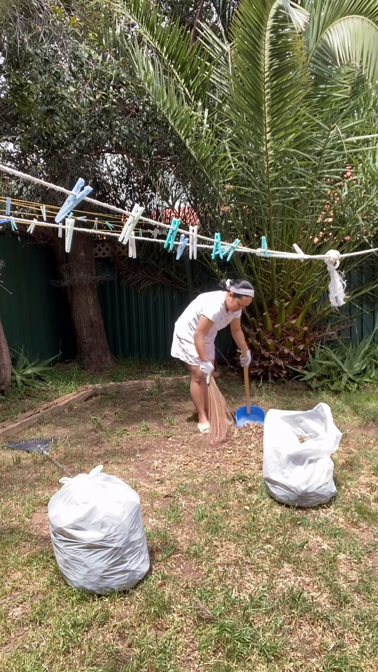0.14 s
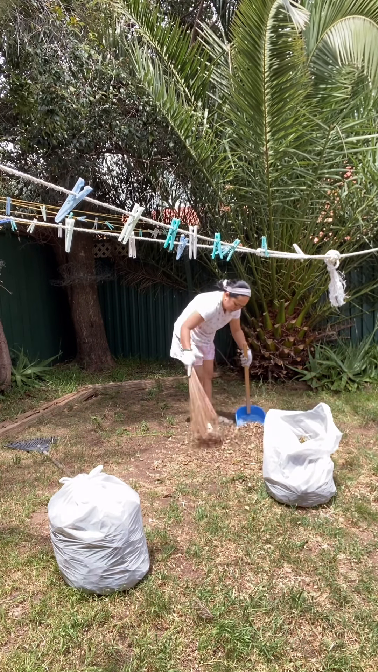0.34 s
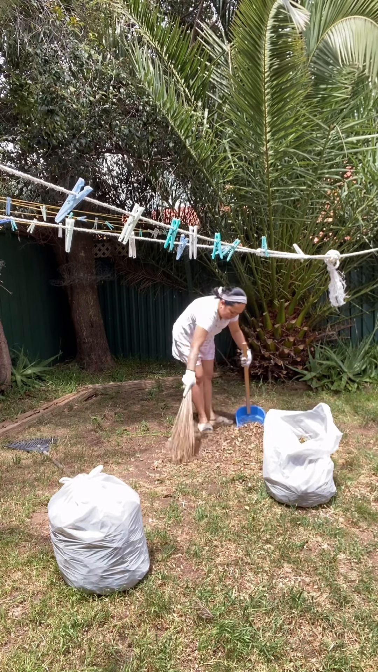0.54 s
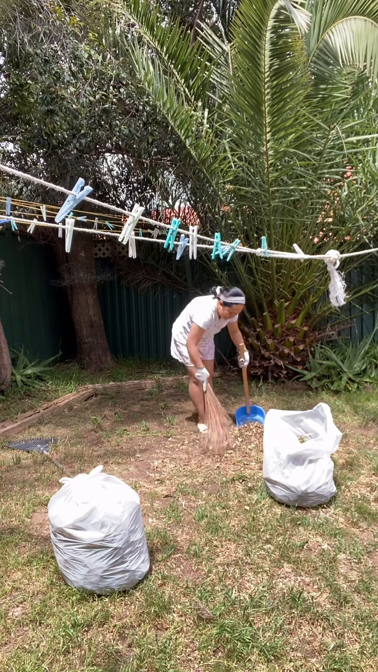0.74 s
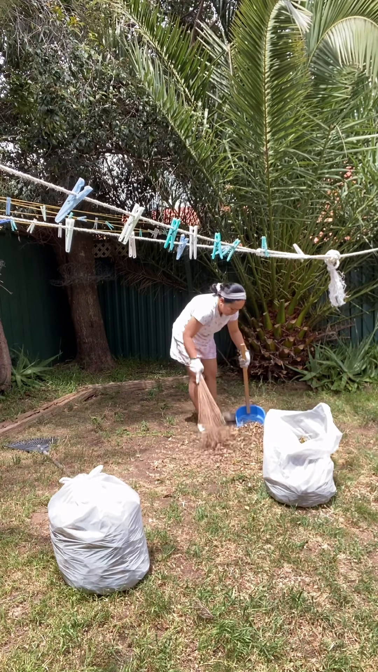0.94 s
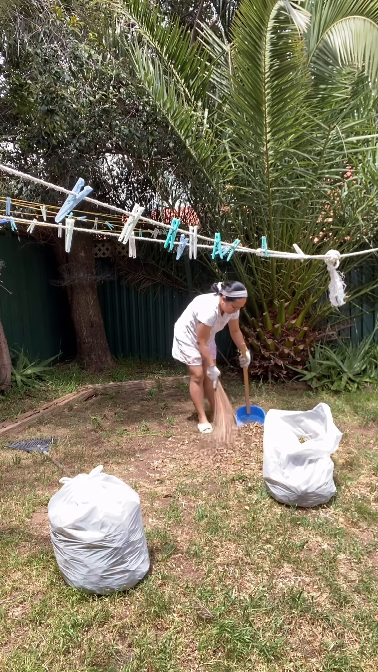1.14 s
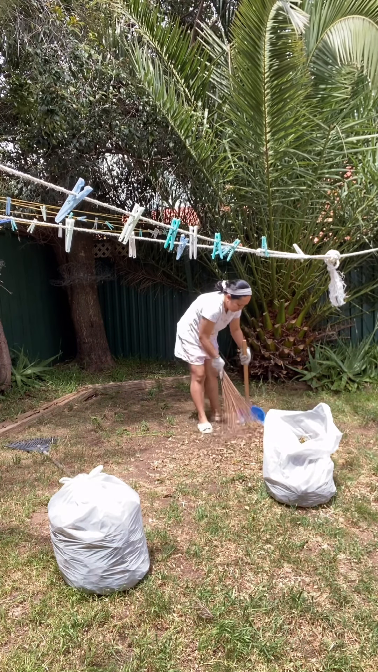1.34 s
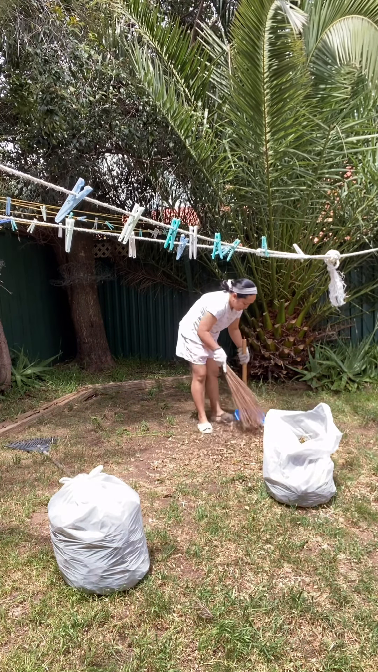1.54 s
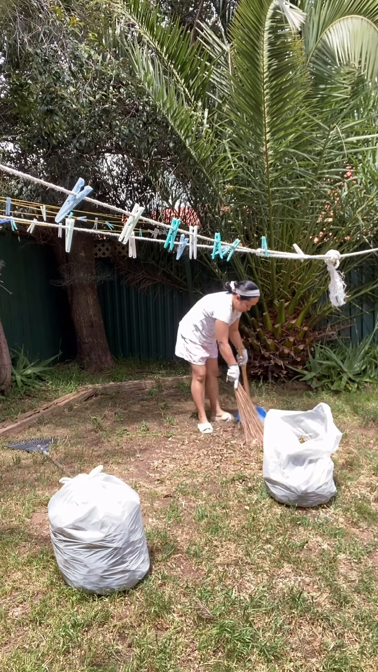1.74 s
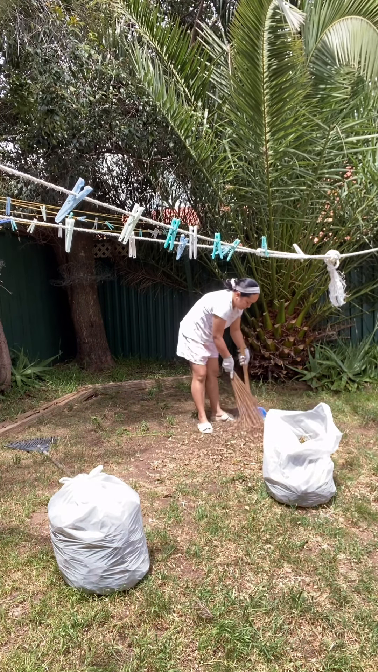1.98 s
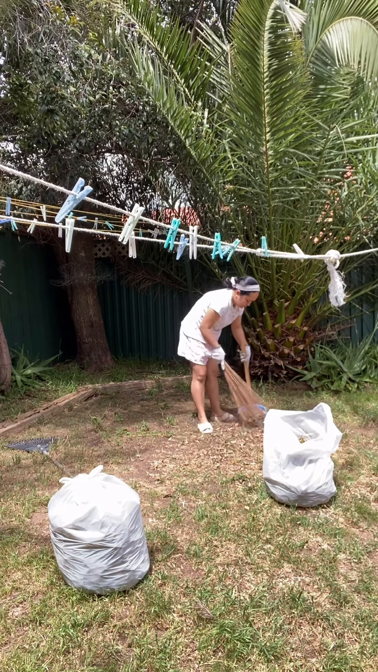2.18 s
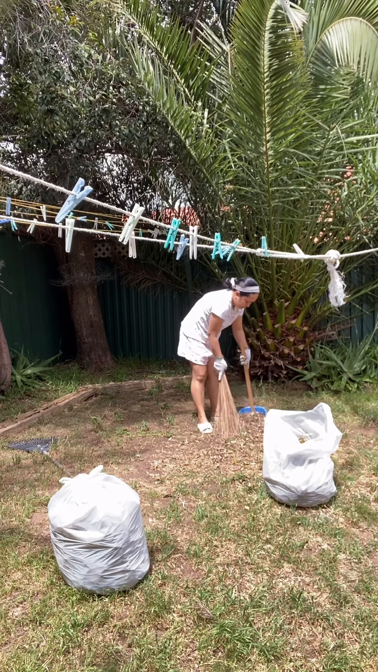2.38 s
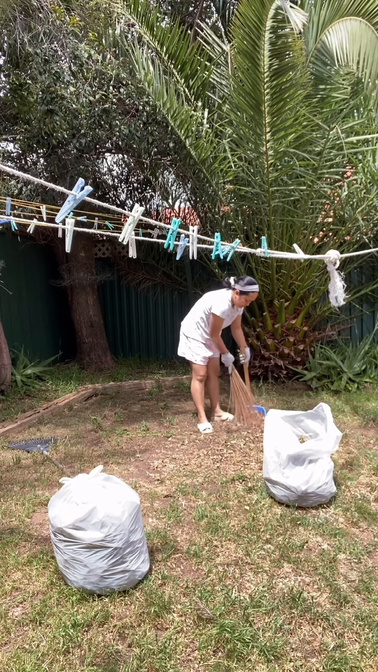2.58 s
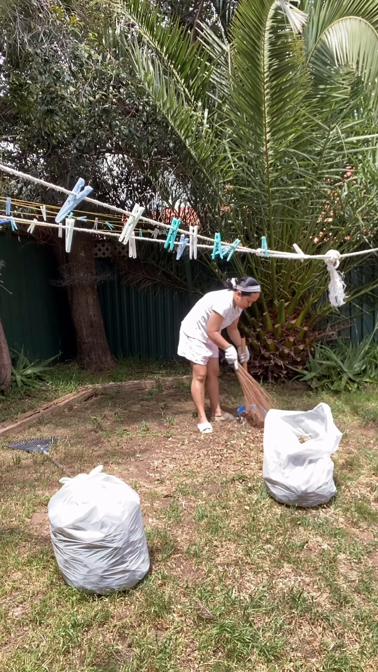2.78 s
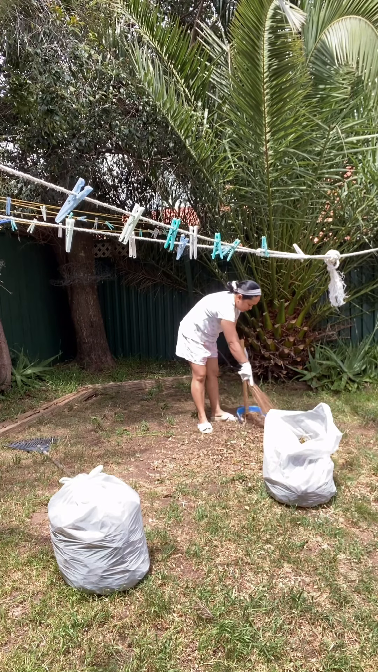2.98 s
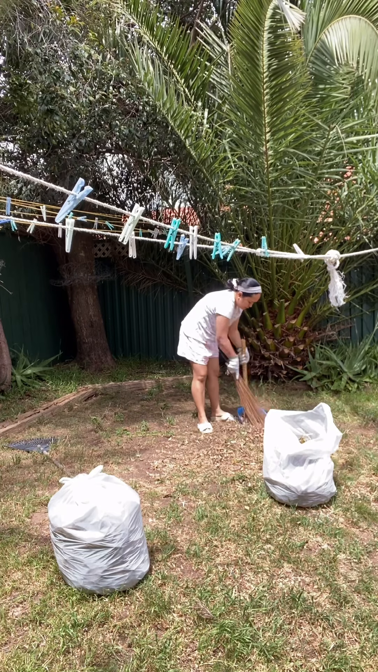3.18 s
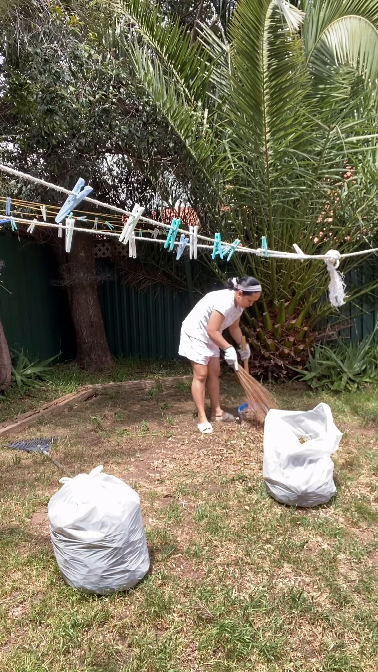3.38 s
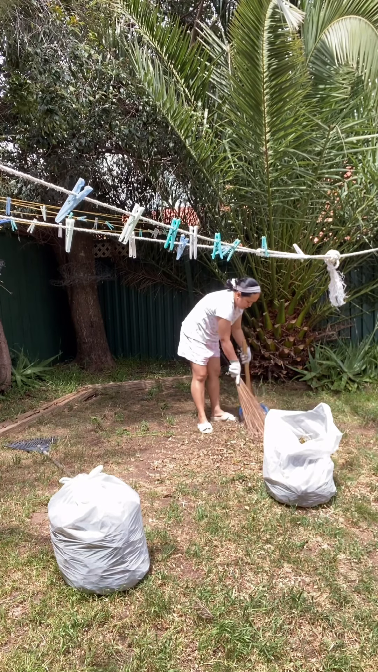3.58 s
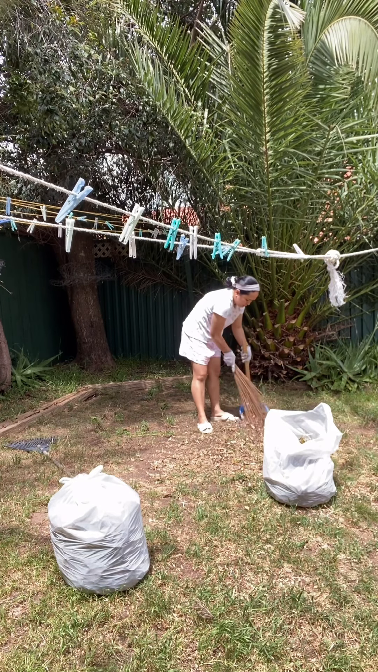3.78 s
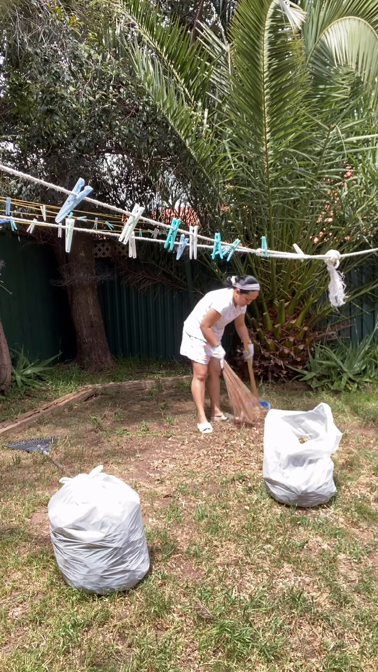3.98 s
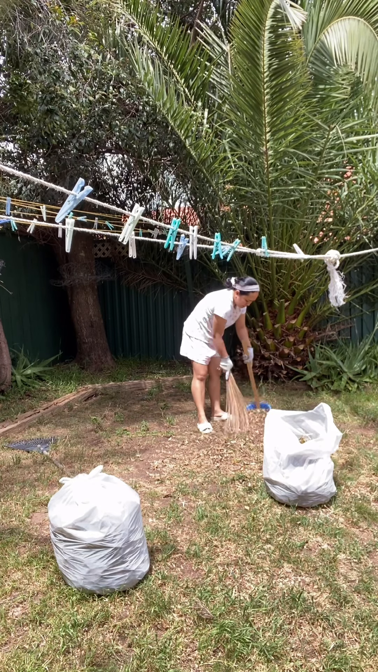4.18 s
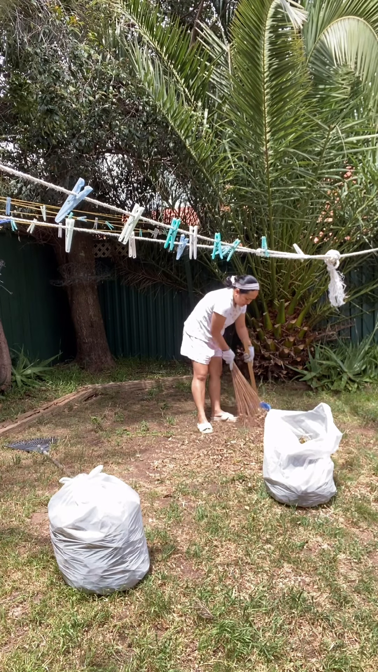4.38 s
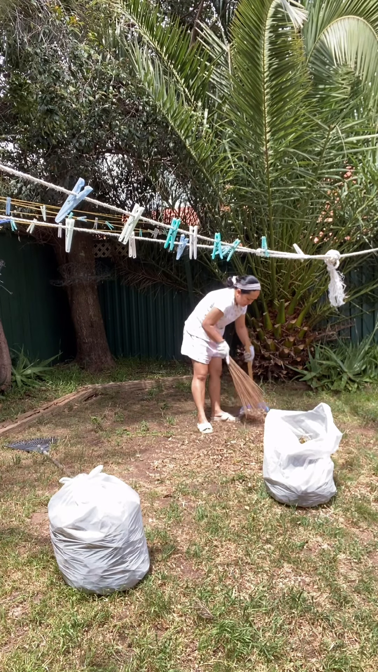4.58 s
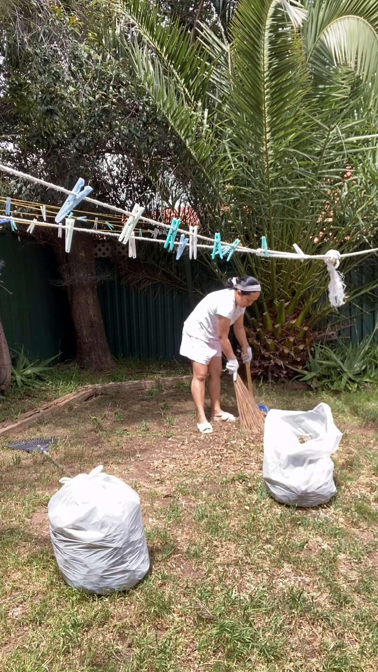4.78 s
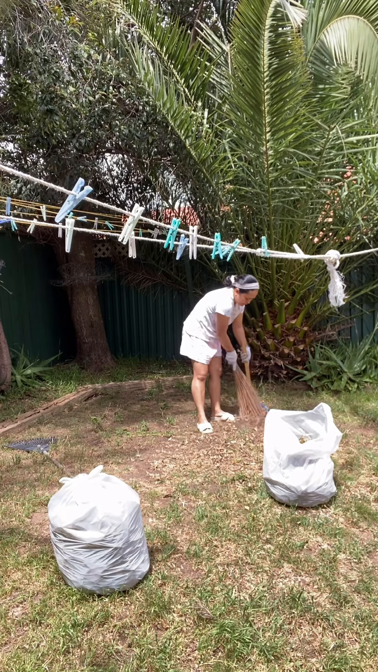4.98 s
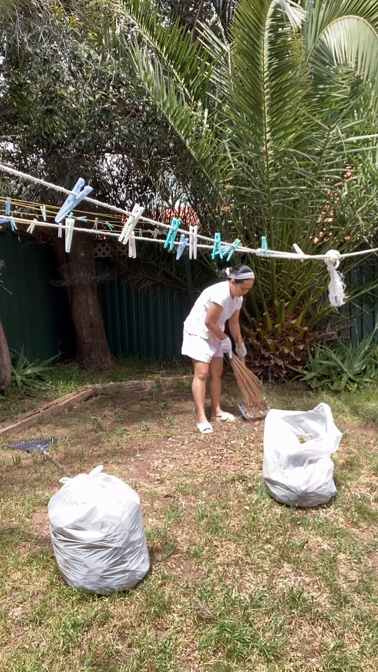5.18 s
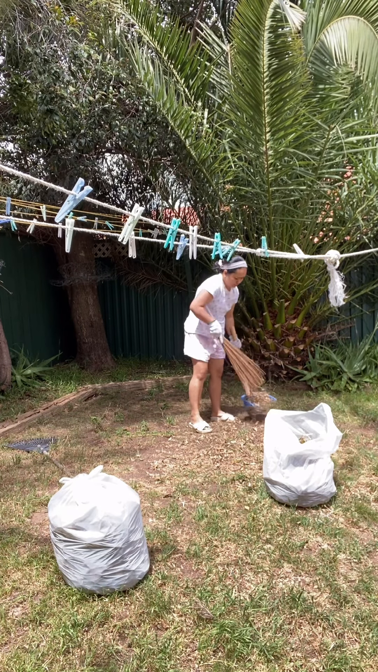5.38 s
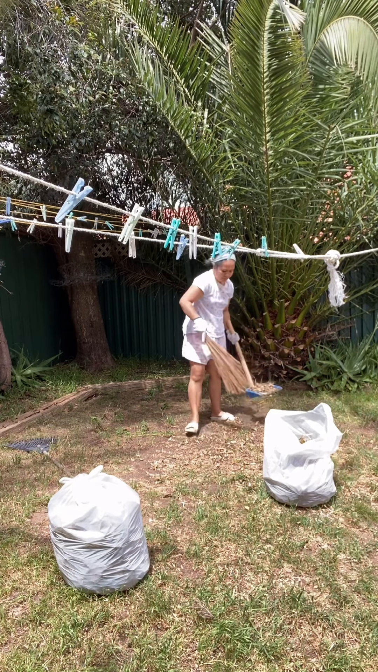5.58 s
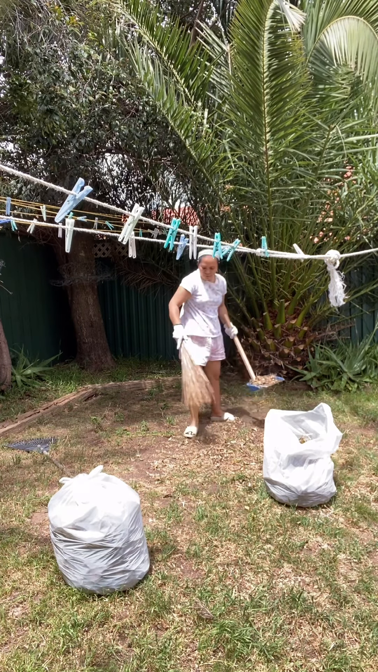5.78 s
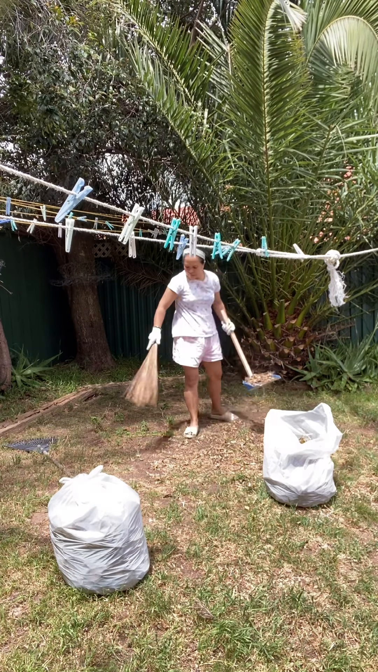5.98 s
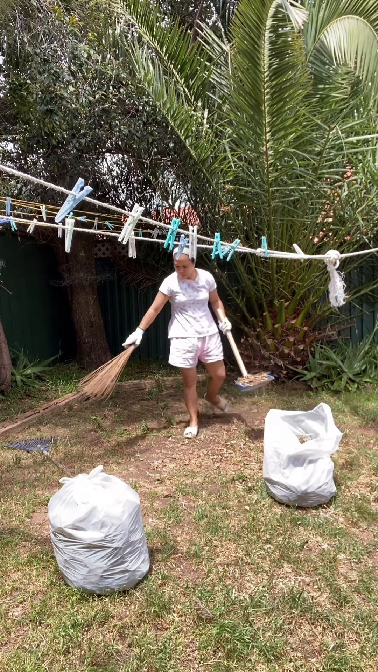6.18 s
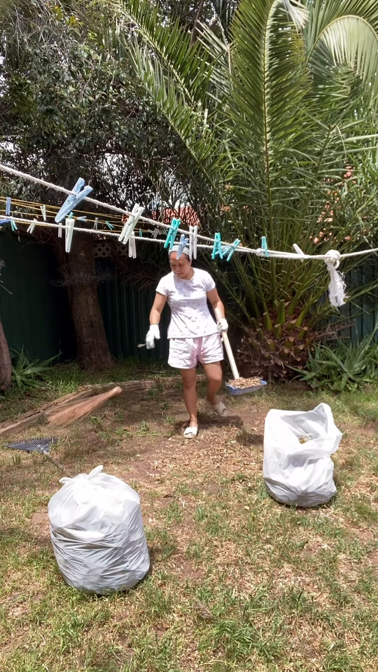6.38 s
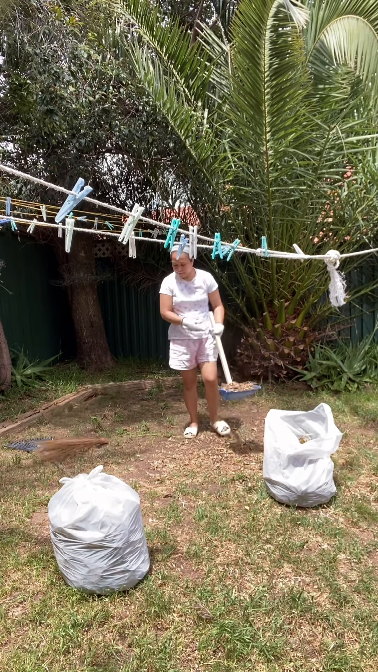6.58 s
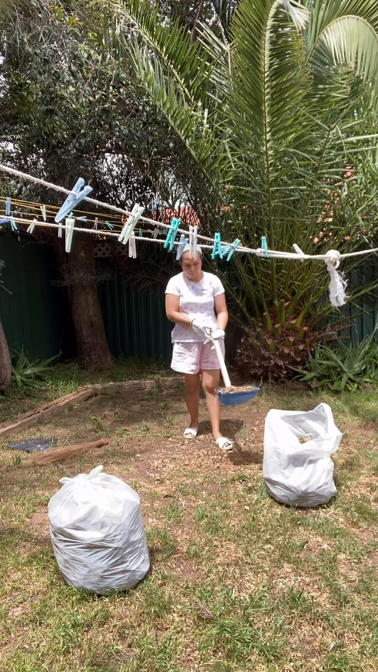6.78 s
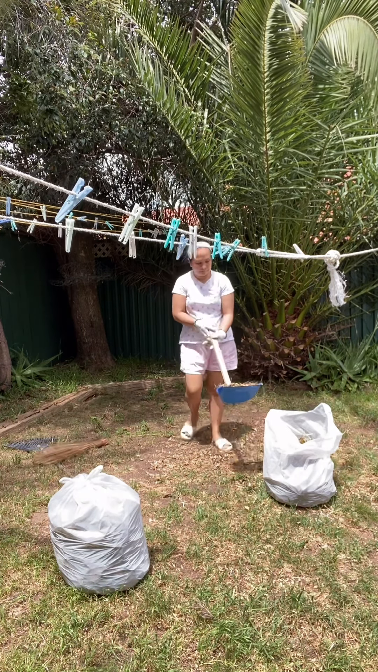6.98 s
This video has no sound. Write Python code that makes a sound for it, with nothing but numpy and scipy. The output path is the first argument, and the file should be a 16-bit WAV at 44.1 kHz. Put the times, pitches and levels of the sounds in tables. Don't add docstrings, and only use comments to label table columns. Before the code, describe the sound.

Coarse bristles rasp across dry ground, roughly a dozen strokes of varied length, some grassy and crisp, with small hollow knocks in between. Then a quieter pause, a twig tick or two, and the tossed broom slaps the lawn with a low bump. Brief rising bird chirps, unsteady road rumble and a thin distant motor drone surround it, in open air on a stereo microphone.

```python
import sys
import numpy as np
from scipy import signal
from scipy.fft import rfft, irfft, next_fast_len
from scipy.io import wavfile

SR = 44100
rng = np.random.default_rng(int(sys.argv[2]) if len(sys.argv) > 2 else 0)


def gain_from_decibels(decibels):
    exponent = np.asarray(decibels, float) / 20
    return 10 ** exponent


def store_pcm(level_fs):
    pcm = np.round(np.clip(level_fs, -1, 1) * 32767).astype(np.int16)
    wavfile.write(sys.argv[1], SR, np.atleast_2d(pcm).T)


N = 310478
PADDED = next_fast_len(N + SR)
HZ = np.maximum(np.arange(PADDED // 2 + 1) * SR / PADDED, 1)
TIME = np.arange(N) / SR

# full pressure at in seconds, peak in dB, rise in seconds, hold in seconds,
# loose grass over the tips in dB.
STROKES = [(0.016, -29.5, 0.13, 0.13, -26), (0.655, -24.5, 0.082, 0.12, -17), (1.2, -27, 0.19, 0.073, -9),
           (1.404, -40.5, 0.025, 0.013, -12), (1.817, -30.5, 0.21, 0.24, -5.5),
           (2.42, -33.5, 0.11, 0.082, -7), (2.552, -32, 0.066, 0.034, -9), (3.017, -32, 0.047, 0.16, -10),
           (3.659, -28, 0.18, 0.035, -5.5), (4.248, -29.5, 0.17, 0.077, -24),
           (4.872, -28.5, 0.13, 0.058, -4), (5.048, -41, 0.091, 0.054, -8),
           (5.55, -48.5, 0.13, 0.074, 12.5)]
LANDINGS = [
    (6.515, -24, 0.025, 0.0097, -26),
    (6.97, -45.5, 0.047, 0.0051, -16),
]
# frequency in Hz, density in dB per Hz.
TIPS_SPECTRUM = [(1500, -21), (3000, 0.5), (4500, -4.5), (6500, 4), (10000, 1.5), (13000, 1.5), (14500, 1),
                 (15400, -33)]
DIRT_SPECTRUM = [(250, -38), (500, 1), (1000, -1.5), (2000, 2.5), (3000, -0.5), (4200, 2), (6000, -56)]
GRASS_SPECTRUM = [(2500, -25), (4000, -4), (5500, -1), (7000, -3), (10000, -20)]

# start in seconds, peak in dB, 60 dB decay in seconds.
SNAPS = [(1.6085, -20, 0.018), (5.8107, -27, 0.02), (6.511, -14, 0.04), (6.5165, -9, 0.07),
         (6.8153, -23, 0.014), (6.0906, -53, 0.02), (6.1942, -49, 0.018), (6.4935, -25, 0.015),
         (.445, -42, .015), (.505, -42, .015), (.99, -36, .015), (4.725, -40, .03), (3.0, -38, .015),
         (3.41, -42, .015)]
# frequency in Hz, density in dB per Hz.
SNAP_SPECTRUM = [(300, -20), (800, -5), (3000, -2), (6500, 2), (14000, 1), (16500, -6)]
# start in seconds, peak in dB, pitch in Hz, 60 dB decay in seconds.
KNOCKS = [(1.61, -23, 780, .035), (1.72, -23, 800, .035), (1.76, -26, 760, .03), (1.865, -25, 870, .035),
          (2.02, -23, 800, .04), (2.6, -24, 800, .05), (6.511, -22, 1350, .035), (6.514, -22, 620, .03),
          (6.515, -24, 340, .04), (6.514, -20, 3600, .09), (6.524, -24, 4250, .09), (6.5168, -8, 130, .14)]

# top note at in seconds, lead-in in seconds,
# top note length in seconds, top level in dB, lead-in level in dB.
PLAIN_CALLS = [(1.59, .021, .026, -28, -35), (2.42, .018, .02, -28, -35), (3.483, .016, .026, -25, -35),
               (4.049, .026, .032, -27, -42), (4.476, .026, .024, -28, -35), (5.243, .02, .045, -27, -38),
               (6.0, .02, .036, -35, -44), (6.457, .02, .04, -22, -37)]
SHORT_CALLS = [(.428, .028, .016, -38, -34), (1.424, .026, .014, -37, -33), (3.424, .028, .012, -37, -32),
               (5.73, .018, .024, -28, -28)]
HOARSE_CALLS = [(4.914, .022, .034, -18, -29), (5.675, .014, .044, -23, -31), (6.828, .024, .046, -22, -27)]
# lead-in from in Hz, lead-in to in Hz, octave in dB,
# top note from in Hz, top note to in Hz.
VOICES = [
    (2900, 3500, -20, 3650, 4780),
    (2600, 3250, -20, 3600, 4400),
    (2650, 3300, 2, 3950, 4900),
]
LEAD_OVERLAPS = [1.1, 1.0, 1.6]
# start in seconds, length in seconds, pitch in Hz, peak in dB.
PEEPS = [(.358, .055, 3450, -42), (5.19, .04, 3800, -38), (5.945, .065, 3350, -40), (6.03, .015, 5300, -41)]

# time in seconds, level of the high orders in dB.
THROTTLE = [(0, -72), (1.2, -83), (2.5, -46), (3.5, -39), (4.5, -43), (5.2, -38.5), (7.04, -38)]
# multiple of the firing rate, level in dB.
LOW_ORDERS = [(2, 2), (3, -2), (4, -0.5), (5, -15)]
HIGH_ORDERS = [(8, -25), (9, -14.5), (10, -4), (11, -5), (12, -4), (13, -2.5), (14, -8), (15, -8), (18, -7)]
# multiple, centre in seconds, half width in seconds, gain in dB.
MOTOR_SWELLS = [(2, 0.38, 0.35, 7), (2, 1.96, 0.41, 10), (2, 4.45, 0.99, 1), (2, 6.71, 0.28, 8.5),
                (3, 3.9, 0.31, 8.5), (3, 5.68, 0.21, 6.5), (4, 2.24, 0.91, 4), (4, 4.18, 0.25, 6.5),
                (4, 6.16, 0.28, 9), (4, 9.3, 0.16, 11.5)]

# time in seconds, pitch in Hz, level in dB.
BOOM = [(0, 65, -35), (.15, 55.3, -23.5), (.6, 55.08, -24.5), (1.08, 57.76, -25), (1.2, 62.6, -47),
        (1.32, 64.16, -24.5), (1.8, 60.04, -27.5), (2.38, 67.47, -25.5), (2.8, 57.8, -31), (3.1, 70, -33),
        (3.6, 70.14, -24.5), (4.1, 63, -27), (4.9, 61.84, -29), (5.3, 68, -31), (5.7, 57, -25.5),
        (6.38, 68.05, -36), (6.8, 64, -32), (6.87, 64.4, -16.5)]
# multiple, centre in seconds, half width in seconds, level in dB.
TRUCK_SWELLS = [(2, 0.45, .7, -43), (2, 3.17, 0.19, -40.5), (2, 4.5, 0.41, -34.5), (2, 6.61, 0.53, -44),
                (3, 0.88, 0.68, -44.5), (3, 3.83, 0.51, -38.5), (4, 1.67, 0.63, -40.5), (4, 5.04, 1.7, -46),
                (4, 6.38, 0.23, -34.5)]
# frequency in Hz, density in dB per Hz.
ROAD_SPECTRUM = [(14, -24), (24, -7), (33, -14.5), (55, 0), (100, -5.5), (150, -16), (300, -17),
                 (520, -20.5), (1000, -23.5), (1630, -24.5), (2430, -28), (4230, -47), (5870, -26.5),
                 (9000, -108)]
# time in seconds, level in dB.
PASSING = [(0, 3.5), (.5, 0), (1.1, -1), (1.9, 2), (2.5, 1.5), (4.2, 1), (4.65, 0.5), (5.6, 3.5), (6.1, 1),
           (7.04, 3.5)]
# peak at in seconds, peak over the wash in dB.
SCUFFS = [(0, 7.5), (.25, 4.5), (.74, 4.5), (1.72, -4), (2.0, 0.5), (2.63, 1), (4.2, -2), (5.52, -3),
          (5.59, 2.5), (6.139, -5.5), (6.52, 1)]

# frequency in Hz, scattered over direct sound in dB, left lag in samples,
# left over right in dB.
PORTS = [(90, -42, .25, 0), (180, -22, 1, .4), (350, -18, 2, .9), (700, -9, 2.5, 1.1),
         (1300, -4.5, 2.2, -.3), (2000, -3.5, 2.1, 1), (2840, -3.5, 6.5, .6), (4100, -4, .5, .4),
         (4900, -14, 4.2, .4), (5800, -19, 4, 0), (7500, -11, 4, 0), (10300, -28, 4.1, 0),
         (13000, -9, 4, 0), (14900, -22, 4.4, 0)]


def broom(grass_db):
    strokes = pressure(STROKES, fall_db_per_s=117)
    landings = pressure(LANDINGS, fall_db_per_s=242)
    contacts = np.vstack([strokes, landings])
    pressed = contacts.sum(0)
    loose_db = np.array(STROKES + LANDINGS)[:, -1]

    tips_gain = pressed + gain_from_decibels(-73)
    dirt_gain = gain_from_decibels(-33.5) * (tips_gain / gain_from_decibels(-26)) ** 0.62
    grass_gain = gain_from_decibels(grass_db - 32) * (gain_from_decibels(loose_db + 29.5) @ contacts) ** 0.96
    crackle_gain = gain_from_decibels(-41.5) * (pressed / gain_from_decibels(-27)) ** 0.67

    tips = gain_from_decibels(3.5 + 1.3 * drift(38)) * colour(slips(per_ms=7.0, spread_db=-1.5), TIPS_SPECTRUM)
    dirt = gain_from_decibels(2.0 + 2.5 * drift(9)) * colour(slips(per_ms=1.8, spread_db=1.5), DIRT_SPECTRUM)
    thin_twigs = band(tips, 9500, "high")
    tips = tips + (gain_from_decibels(0.57 * drift(25.0)) - 1) * thin_twigs
    grass = gain_from_decibels(2.4 * drift(18)) * colour(slips(per_ms=1.6, spread_db=3.0), GRASS_SPECTRUM)
    crackle = colour(slips(per_ms=0.2, spread_db=6.0), TIPS_SPECTRUM)

    layers = tips_gain * tips + dirt_gain * dirt + grass_gain * grass + crackle_gain * crackle
    return gain_from_decibels(0.99 * drift(6)) * layers


def pressure(rows, fall_db_per_s):
    s, db, rise, hold = np.array(rows).T[:4, :, None]
    after = np.maximum(TIME - s - hold, 0)
    to_go = np.maximum(s - TIME, 0) / np.maximum(rise, 0.005)
    before = gain_from_decibels(-20.5 * to_go ** 1.42)
    debris = gain_from_decibels(-13 - 35.5 * after)
    return gain_from_decibels(db) * before * (gain_from_decibels(-fall_db_per_s * after) + debris)


def slips(per_ms, spread_db):
    sizes = gain_from_decibels(spread_db * np.minimum(rng.exponential(1, N), 5)) * rng.choice([-1, 1], N)
    chance = np.clip(per_ms * 1000 / SR, 0.005, 1)
    return sizes * (rng.random(N) < chance) / np.sqrt(chance)


def snaps():
    envelope = np.zeros(N)
    for s, peak_db, t60 in SNAPS:
        age = np.maximum(TIME - s, 0)
        envelope += (TIME >= s) * gain_from_decibels(peak_db - 1.5 - 60 * age / max(t60, 0.003))
    return envelope * colour(rng.standard_normal(N), SNAP_SPECTRUM)


def knocks():
    out = np.zeros(N)
    for s, peak_db, hz, t60 in KNOCKS:
        t = np.maximum(TIME - s, 0)
        soft_start = 1 - np.exp(-t * hz)
        out += gain_from_decibels(peak_db - 60 * t / t60) * soft_start * np.sin(2 * np.pi * hz * t)
    return out


def birds():
    out = np.zeros(N)
    for s, length, from_hz, to_hz, peak_db, octave_db in notes():
        u = np.linspace(0, 1, round(length * SR))
        glide_hz = from_hz + (to_hz - from_hz) * (1.2 * u - 0.083 * u ** 2)
        phase = 2 * np.pi * np.cumsum(glide_hz) / SR
        note = np.sin(phase) + gain_from_decibels(octave_db) * np.sin(2 * phase)
        out[round(s * SR):][:len(u)] += gain_from_decibels(peak_db) * np.sin(np.pi * u ** 1.1) * note
    near, far = (signal.fftconvolve(out, tail(t60=0.31))[:N] for path in range(2))
    return np.array([out + gain_from_decibels(-4) * near, gain_from_decibels(-2.5) * far])


def notes():
    rows = [(s, length, hz, hz * 1.06, db, -20) for s, length, hz, db in PEEPS]
    birds_calls = [PLAIN_CALLS, SHORT_CALLS, HOARSE_CALLS]
    for calls, voice, overlap in zip(birds_calls, VOICES, LEAD_OVERLAPS):
        low_hz, mid_hz, octave_db, from_hz, to_hz = voice
        for s, lead, length, top_db, lead_db in calls:
            rows.append((s - lead, overlap * lead, low_hz, mid_hz, lead_db, octave_db))
            rows.append((s, length, from_hz, to_hz, top_db, -40))
    return rows


def tail(t60):
    t = np.arange(SR // 2) / SR
    echoes = rng.standard_normal(len(t)) * gain_from_decibels(-60 * t / t60)
    return echoes / np.sqrt(np.sum(echoes ** 2))


def motor():
    firing_hz = 122.33
    high_db, = in_time(THROTTLE)
    low_db = -43 + 0.16 * (high_db - high_db.max())
    lifted = []
    for k, db in LOW_ORDERS:
        swell_db = sum(gain_db * np.exp(-((TIME - s) / half) ** 2)
                       for j, s, half, gain_db in MOTOR_SWELLS if round(j) == round(k))
        lifted.append((k, db + swell_db))
    low = drone(firing_hz, lifted, fading_db=0.5, wander=0.00166, blur=0.25)
    high = drone(firing_hz, HIGH_ORDERS, fading_db=3, wander=0.002, blur=1.1)
    return gain_from_decibels(low_db) * low + gain_from_decibels(high_db - 2.5) * high


def drone(hz, orders, fading_db, wander, blur):
    phase = 2 * np.pi * np.cumsum(hz * (1 + wander * drift(1.346))) / SR
    out = np.zeros(N)
    for k, db in orders:
        gain = gain_from_decibels(db + fading_db * drift(3.3)) * np.sqrt(2)
        out += gain * np.sin(k * phase + rng.uniform(0, 6.7) + blur * drift(12.2))
    return out


def traffic():
    hz, boom_db = in_time(BOOM)
    phase = 2 * np.pi * np.cumsum(hz + 2.0 * drift(4.37)) / SR + 0.75 * drift(5.6)
    boom_gain = gain_from_decibels(boom_db - 1.0 + 2.0 * drift(6.1)) * np.sqrt(2)
    boom = boom_gain * (np.sin(phase) + gain_from_decibels(-21.0) * np.sin(4 * phase))

    swells = [(round(k), np.maximum(db - 6 * ((TIME - s) / half) ** 2, -90))
              for k, s, half, db in TRUCK_SWELLS]
    truck = drone(47.8, swells, fading_db=3.0, wander=0.00792, blur=0.4)

    passing_db, = in_time(PASSING)
    wash = colour(rng.standard_normal(N), ROAD_SPECTRUM)
    hiss = band(wash, 900, "high")
    rustle = band(wash, [300, 800], "band")
    scuffs = sum(gain_from_decibels(db + np.minimum(6 * (TIME - s) / 0.025, 80 * (s - TIME))) for s, db in SCUFFS)
    wash += ((gain_from_decibels(-4.0 + 0.72 * drift(5.4)) + 0.69 * scuffs - 1) * hiss
             + (gain_from_decibels(-3.0 + 0.79 * drift(23.0)) + scuffs - 1) * rustle)
    return boom + truck + gain_from_decibels(passing_db - 28.0 + 1.2 * drift(3.4)) * wash


def band(x, hz, kind):
    return signal.sosfilt(signal.butter(2, hz, kind, fs=SR, output="sos"), x)


def rms_one(x):
    return x / np.sqrt(np.mean(x ** 2) + 1e-20)


def in_time(rows):
    s, *columns = np.transpose(rows)
    return [np.interp(TIME, s, c) for c in columns]


def by_hz(points, index=1):
    points = np.array(points)
    return np.interp(np.log(HZ), np.log(points[:, 0]), points[:, index])


def colour(x, spectrum):
    return rms_one(irfft(rfft(x, PADDED) * gain_from_decibels(by_hz(spectrum)), PADDED)[:N])


def drift(rate):
    hop, settle = 40, 2000
    r = np.exp(-2 * np.pi * rate * hop / SR)
    noise = rng.standard_normal(N // hop + settle + 2)
    slow = signal.lfilter([1], [1, -2 * r, r * r], noise)[settle:]
    return np.interp(np.arange(N) / hop, np.arange(len(slow)), rms_one(slow))


def ports(direct, scattered):
    share = gain_from_decibels(by_hz(PORTS))
    power = np.sqrt(1 + share ** 2)
    mid = rfft(direct, PADDED) / power
    side = rfft(scattered, PADDED) * share / power
    lag = np.exp(-2j * np.pi * HZ * by_hz(PORTS, index=2) / SR)
    tilt = gain_from_decibels(by_hz(PORTS, index=3) / 2)
    left = (mid + side) * lag * tilt
    right = (mid - side) / tilt
    return irfft(np.array([left, right]), PADDED)[:, :N]


def scene():
    grass_levels_db = (0, 8.5)
    noisy = np.array([broom(db) + snaps() + motor() + traffic() for db in grass_levels_db])
    direct, scattered = noisy + birds()
    return ports(direct + knocks(), scattered)


def band_limit(x):
    return signal.sosfilt(signal.butter(12, 15760, fs=SR, output="sos"), x)


def record(dry):
    rounded = 1.135 * np.tanh(dry / 1.27)
    low_pass = signal.cheby2(14, 70, 16500, fs=SR, output="sos")
    return band_limit(signal.sosfilt(low_pass, rounded))


dry = scene()
out = record(dry)
store_pcm(out)
```